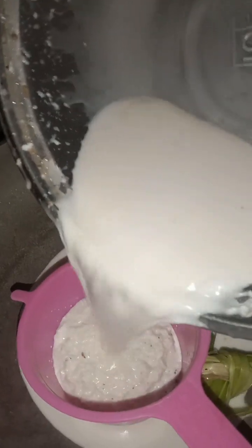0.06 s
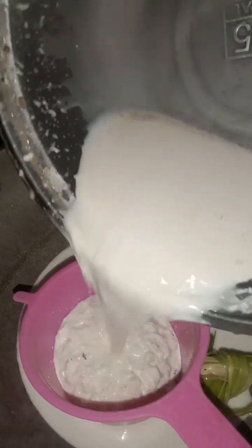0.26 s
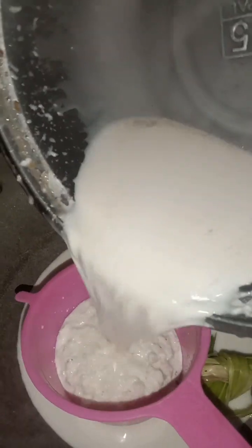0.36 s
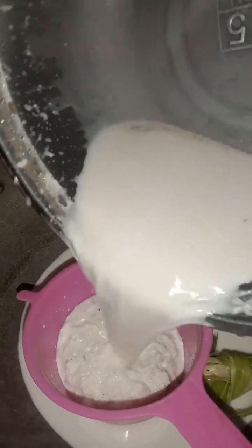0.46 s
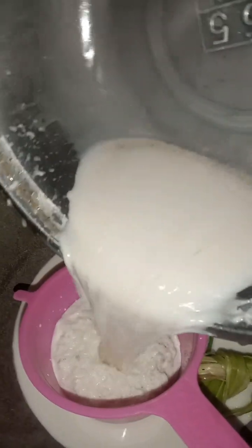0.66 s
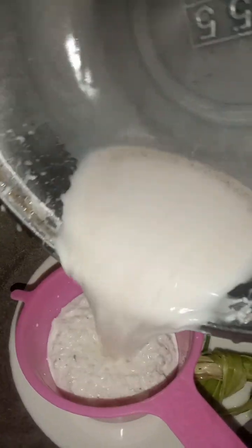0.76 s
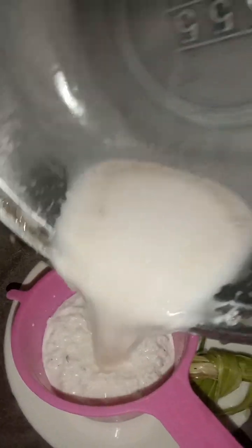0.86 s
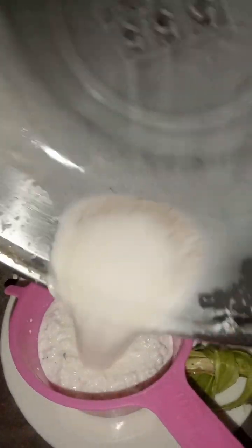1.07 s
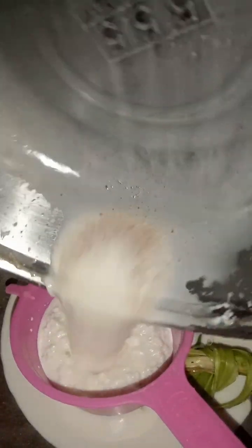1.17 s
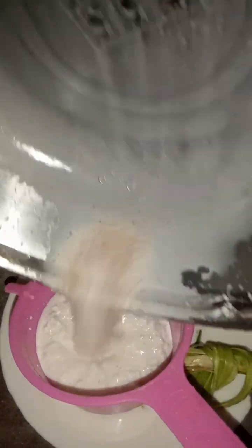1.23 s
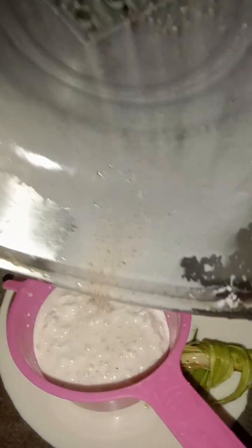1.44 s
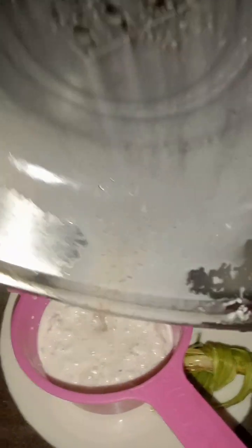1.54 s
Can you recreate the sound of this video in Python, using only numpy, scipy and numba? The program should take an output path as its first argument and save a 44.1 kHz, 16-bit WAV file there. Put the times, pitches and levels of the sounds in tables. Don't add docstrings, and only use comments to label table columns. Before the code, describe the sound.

Thin milky liquid pours from a bowl through a plastic strainer into a pan, hissing and bubbling; a faint low groan of the rim early, then stronger splats, bubble pings and fading trickle, close in a kitchen.

```python
import sys
import numpy as np
from scipy import signal
from scipy.fft import rfft, irfft
from scipy.io import wavfile
from scipy.ndimage import uniform_filter1d
from numba import njit

SR = 44100
rng = np.random.default_rng(int(sys.argv[2]) if len(sys.argv) > 2 else 0)


def gain_from_db(level_db):
    decades = np.asarray(level_db, float) / 20
    return 10 ** decades


def to_wav(s):
    ch = np.atleast_2d(s).T
    pcm = np.round(np.clip(ch, -1, 1) * 32767)
    wavfile.write(sys.argv[1], SR, pcm.astype(np.int16))


N = 70560
T = np.arange(N) / SR

# (time [s], flow [dB], mist [dB], bubbling [dB], gurgle [dB])
FLOW = [(0, -46.5, -20, -19, -7), (.1, -51, -19, -11, -12), (.22, -47.5, -4.5, -15.5, -8.5),
        (.36, -46, -17, -16.5, -12), (.5, -46.5, -4.5, -16, -7.5), (.6, -48.5, -17.5, -15, -13.5),
        (.655, -51, -30, -18, -9), (.69, -42.5, -9.5, -35, -17.5), (.78, -40.5, -6, -10, -5.5),
        (.85, -45.5, -10, -13, -11), (.93, -41.5, -7, -24, -12.5), (1.0, -38.5, -10, -0.5, -10),
        (1.12, -41, -5, -7.5, -11), (1.2, -44.5, -14, -6.5, -9.5), (1.3, -45, -10, -4.5, -14),
        (1.38, -48.5, -20, -24, -13), (1.48, -53, -8, -15.5, -8), (1.6, -58.5, -39, -9, -8)]
# (time [s], peak [dB], pitch [Hz], mist re peak [dB])
SPLAT_EVENTS = [(0.0754, -40, 5700, -13), (0.108, -50, 4830, 6.5), (0.1724, -59, 5400, 2),
                (0.205, -44.5, 6400, 6.5), (0.2306, -26.5, 5300, -33), (0.2738, -28, 6300, -11),
                (0.3396, -28.5, 4550, -26), (0.3904, -50, 5190, -12), (0.4748, -26, 5230, -12),
                (0.5202, -33, 6500, -8), (0.5445, -23.5, 4700, -46), (0.6663, -19, 5250, -19),
                (0.6834, -21, 4940, -23), (0.7397, -32, 5550, -18), (0.7537, -26, 6570, -17),
                (0.7709, -18.5, 5380, -37), (0.7794, -17.5, 5620, -23), (0.795, -14.5, 4970, -6.5),
                (0.8808, -21.5, 5250, -11), (0.9182, -23.5, 5400, -35), (0.9402, -28, 5360, -37),
                (0.7745, -21, 5210, -30), (0.804, -30, 5800, -25), (0.82, -25.5, 4980, -42),
                (0.8654, -32.5, 4890, -30), (0.9986, -20.5, 5300, -22.5), (1.0115, -29, 4900, -25),
                (1.044, -36, 5070, 5), (1.083, -28.5, 7100, -5.5), (1.2759, -32, 5370, -22),
                (0.9645, -26, 5050, -10), (1.0316, -20, 6660, -17), (1.1104, -23.5, 4860, -9),
                (1.2312, -25, 6170, -7.5), (1.3274, -28.5, 4860, -13), (1.4057, -30.5, 5730, -5.5)]


def unit(x):
    return x / np.sqrt(np.mean(x ** 2))


def noise():
    return rng.standard_normal(N)


def curve(table, column):
    table = np.array(table, float)
    return np.interp(T, table[:, 0], table[:, column])


def band(x, lo_hz, hi_hz):
    sos = signal.butter(3, [lo_hz, min(hi_hz, .45 * SR)], "bandpass", fs=SR, output="sos")
    return signal.sosfilt(sos, x)


def colour(x, points):
    hz, db = np.array(points, float).T
    f_hz = np.arange(N // 2 + 1) * SR / N + 1
    gain = gain_from_db(np.interp(np.log(f_hz), np.log(hz), db))
    return unit(irfft(rfft(x) * gain, N))


def flicker(rate_hz, depth_db):
    k = int(SR / rate_hz)
    steps = np.repeat(rng.standard_normal(N // 100), k)[:N]
    return gain_from_db(depth_db * unit(uniform_filter1d(steps, k)))


@njit
def resonate(x, hz, width_hz):
    y, b, l = np.empty(len(x)), 0., 0.
    for i in range(len(x)):
        g, k = np.tan(np.pi * hz[i] / SR), width_hz / hz[i]
        v = (b + g * (x[i] - l)) / (1 + g * (g + k))
        b, l, y[i] = 2 * v - b, l + 2 * g * v, k * v
    return y


@njit
def ring(start, hz, cycles, size, glide, length):
    y = np.zeros(length)
    for j in range(len(start)):
        n, phase = cycles[j] * SR / hz[j], 0.
        for i in range(min(int(5 * n), length - start[j])):
            phase += 2 * np.pi * hz[j] / SR * (1 + glide * i / n)
            y[start[j] + i] += size[j] * (np.exp(-i / n) - np.exp(-6 * i / n)) * np.sin(phase)
    return y


def bubbles(lo_hz, hi_hz, cycles, scatter_db, glide, count):
    u = rng.random((count, 4)).T
    start = (u[0] * N).astype(np.int64)
    hz = lo_hz * (hi_hz / lo_hz) ** u[1]
    size = gain_from_db(-scatter_db * np.log(1 - u[3]))
    return unit(ring(start, hz, cycles * (.5 + u[2]), size, float(glide), N))


def clump(rows):
    delay_s, drop_db, spread = .01, -9, .05
    rows = np.array(rows, float)
    u = rng.random((len(rows), 3, 2))
    out = [rows]
    for k, side in ((1, -1), (2, 1)):
        r = rows.copy()
        r[:, 0] += delay_s * (.3 + u[:, k, 0])
        r[:, 1] += drop_db
        r[:, 2] *= 1 + side * spread * (0.364 + u[:, k, 1])
        out.append(r)
    return np.concatenate(out)


def bursts(db, t60_s):
    attack_s = .001
    dt = np.maximum(T - np.array(SPLAT_EVENTS)[:, :1], 0)
    envelopes = gain_from_db(db[:, None]) * (1 - np.exp(-dt / attack_s)) * 1000. ** (-dt / t60_s)
    return np.sqrt(np.sum(envelopes ** 2, axis=0))


def spray():
    # (frequency [Hz], density [dB per Hz])
    fizz_spectrum = [(4100, -22), (4400, -8.5), (4900, 1), (5500, 5), (6800, -1), (7600, -10), (9000, -16),
                     (10400, -10)]
    flow_db = curve(FLOW, 1)
    s = np.array(SPLAT_EVENTS)
    peak_db, mist_db = s[:, 1], s[:, 1] + s[:, 3]

    fizz = bubbles(3690, 11480, 8.5, 1.23, 0.09, count=9000) + 0.42 * noise()
    fizz = colour(fizz, [(3000, -5)] + list(fizz_spectrum) + [(10900, -55)])
    fizz_level = gain_from_db(flow_db) * flicker(60.21, 1.9) + gain_from_db(-16) * bursts(peak_db, t60_s=.045)

    mist = bubbles(10770, 14070, 2.3, 3.2, 0, count=4000)
    mist = colour(mist, [(10200, -26), (10800, -5.5), (13000, -1), (15300, 11.5)])
    mist_level = gain_from_db(flow_db + curve(FLOW, 2)) * flicker(89.55, 2.1)
    mist_level = mist_level + gain_from_db(-4.0) * bursts(mist_db, t60_s=0.032)

    crack = unit(band(noise(), 3600, 10000)) * gain_from_db(-8.5) * bursts(mist_db, t60_s=0.054)

    c = clump(SPLAT_EVENTS)
    start = (c[:, 0] * SR).astype(np.int64)
    pips = ring(start, c[:, 2], np.full(len(c), 12.), gain_from_db(c[:, 1] + 0.5), 0.019, N)
    return fizz * fizz_level + mist * mist_level + crack + pips


def trickle():
    # (frequency [Hz], density [dB per Hz])
    froth_spectrum = [(1900, -44), (2250, -6.5), (2550, -8), (2850, -3.5), (3150, -0.5), (3500, -0.5),
                      (3900, -0.5), (4300, -19)]
    pan_start_hz, pan_end_hz, pan_width_hz = 1265, 1445, 23
    flow_db = curve(FLOW, 1)
    froth = colour(bubbles(1980, 4146, 7.9, 2.2, 0.025, count=1600), froth_spectrum)
    low = bubbles(1150, 1900, 8., 1.5, .05, count=1500)
    pan_hz = (pan_start_hz + (pan_end_hz - pan_start_hz) * T / T[-1]) * flicker(26.6, 0.05)
    gurgle = .5 * unit(resonate(low + noise(), pan_hz, float(pan_width_hz))) + low
    return froth * gain_from_db(flow_db + curve(FLOW, 3)) + gurgle * gain_from_db(flow_db + curve(FLOW, 4))


def pings():
    # (time [s], peak [dB], pitch [Hz],
    # ring [s])
    low_events = [(.195, -47, 1700, .13), (.175, -49, 1255, .12), (.245, -45, 1245, .07),
                  (.325, -43, 1250, .12), (.39, -42, 1240, .04), (.28, -52, 1280, .1), (.43, -49, 1290, .2),
                  (.53, -51, 1300, .25), (.66, -49, 1280, .05), (.36, -50, 850, .11), (.03, -56, 700, .25),
                  (.1, -50, 135, .14), (.1, -50, 500, .2), (.37, -54, 130, .1), (.32, -47, 700, .05),
                  (.466, -44, 862, .06), (.468, -45, 718, .09), (.468, -50, 500, .2), (.7, -50, 1010, .06),
                  (.712, -41, 1270, .08), (.757, -38, 1290, .055), (.76, -44, 1650, .06),
                  (.79, -35, 1290, .035), (.815, -33, 1190, .045), (.818, -41, 1480, .05),
                  (.85, -47, 1100, .06), (.872, -44, 1170, .08), (.888, -41, 1010, .05),
                  (.81, -52, 500, .09), (.88, -50, 500, .14), (.964, -44, 842, .07), (.965, -48, 311, .13),
                  (.96, -50, 1200, .05), (1.03, -44, 1650, .06), (1.095, -44, 1650, .06),
                  (1.04, -46, 1370, .08), (1.09, -43, 1370, .12), (1.09, -50, 800, .06),
                  (1.172, -43, 1358, .07), (1.236, -41, 1360, .1), (1.29, -56, 698, .3),
                  (1.425, -58, 300, .12), (1.25, -60, 310, .2)]
    # (time [s], peak [dB], pitch [Hz], ring [s])
    high_events = [(.468, -49, 3780, .05), (.545, -52, 4080, .09), (.68, -52, 3180, .06),
                   (.7935, -35, 3000, .012), (.7935, -40, 2350, .015), (.939, -40, 3860, .03),
                   (.971, -28, 2790, .018), (.991, -21, 2860, .026), (1.009, -31, 2780, .02),
                   (1.025, -37, 2850, .04), (1.043, -34, 2950, .015), (.99, -39, 3450, .04),
                   (1.015, -36, 3300, .025), (1.044, -38, 3650, .03), (1.005, -42, 2250, .04),
                   (1.173, -42, 2280, .025), (1.174, -42, 2900, .02), (1.233, -32, 2900, .022),
                   (1.275, -41, 3470, .035), (1.075, -46, 3550, .1), (1.325, -51, 2400, .03),
                   (.875, -55, 2750, .06)]
    hold, fade, glide = .35, .4, .015
    events = clump(list(low_events) + list(high_events))
    start_s, peak_db, hz, ring_s = events.T[:, :, None]
    dt = np.maximum(T - start_s, 0)
    swell = np.sin(np.pi / 2 * np.minimum(dt / (0.0057 + 0.84 / hz), 1)) ** 2
    decay = 1000. ** (-np.maximum(dt - hold * ring_s, 0) / (fade * ring_s))
    tone = np.sin(2 * np.pi * hz * dt * (1 + glide * np.minimum(dt / ring_s, 1) / 2))
    return np.sum(gain_from_db(peak_db) * swell * decay * tone, axis=0) * flicker(150, 2.2)


def body(x, modes):
    lean_s = .25
    lean = np.clip(T / lean_s, 0, 1) ** 2
    out = 0
    for hz, width_hz, db, lean_db, rise in modes:
        hz = hz * flicker(12, .12) * (1 + rise * lean)
        level = gain_from_db(db + lean_db * lean) * flicker(11.7, 0.29)
        once = resonate(x, hz, float(width_hz))
        out = out + level * unit(resonate(once, hz, float(width_hz)))
    return unit(out)


def groan():
    # (time [s], hum [dB], rasp [dB])
    friction = [
        (.03, -80, -75),
        (.065, -42, -58.5),
        (.13, -61, -47),
        (.17, -50, -47.5),
        (.28, -44.5, -42.5),
        (.33, -55, -46.5),
        (.38, -46, -66.5),
        (.48, -58, -52.5),
        (.53, -83, -85),
    ]
    # (frequency [Hz], width [Hz], level [dB], gain on leaning [dB], pitch rise on leaning [0-1])
    bowl_modes = [(133, 40, -2, 1.5, 0), (296, 57, -12.5, 5.5, 0.01), (500.7, 120, 0, -6, 0.02),
                  (690.3, 85, -10, 8.5, 0.08)]
    slip_hz = 67.03
    turn = np.cumsum(slip_hz * flicker(30.03, 0.35)) / SR
    slips = np.diff(np.floor(turn), prepend=0) * flicker(70, 1.7)
    hum = np.sin(2 * np.pi * turn) * flicker(44, 1)
    rasp = body(slips + 0.067 * noise(), bowl_modes)
    return hum * gain_from_db(curve(friction, 1)) + rasp * gain_from_db(curve(friction, 2))


def rumble():
    # (time [s], level [dB])
    shift = [
        (.72, -72),
        (.78, -49.5),
        (.83, -53.5),
        (.93, -62.5),
        (.99, -82),
        (1.06, -71),
        (1.12, -62),
        (1.18, -74),
        (1.52, -83),
        (1.58, -65),
    ]
    # (frequency [Hz], width [Hz], level [dB], gain on leaning [dB], pitch rise on leaning [0-1])
    pan_modes = [(83.4, 25, 0.5, 0.5, 0.09), (125.4, 43, -1, 3, 0.02)]
    return body(noise(), pan_modes) * gain_from_db(curve(shift, 1))


def kitchen():
    # (frequency [Hz], density [dB per Hz])
    room_spectrum = [(40, -29), (95, -46), (150, -1.5), (220, -21.5), (1500, -7.5), (2200, -31.5),
                     (6000, -34), (10300, -16)]
    floor = colour(noise(), list(room_spectrum) + [(11000, -35)])
    return floor * gain_from_db(-61.5 + 2.5) * flicker(7.74, 0.69)


def echo(near):
    t60_s, level_db = .25, -8
    n = np.arange(SR // 2)
    tail = rng.standard_normal(len(n)) * 1000. ** (-n / SR / t60_s)
    wet = signal.fftconvolve(near, tail / np.sqrt(np.sum(tail ** 2)))[:N]
    return gain_from_db(level_db) * band(wet, 44, 11000)


def scene():
    near = spray() + trickle() + pings() + groan() + rumble()
    return (near + echo(near) + kitchen())[None]


def low_pass(x):
    return signal.sosfilt(signal.butter(12, 16380, fs=SR, output="sos"), x)


def record(dry):
    low_cut = signal.butter(3, 52, "highpass", fs=SR, output="sos")
    top_cut = signal.ellip(8, .2, 60, 15300, fs=SR, output="sos")
    mix = signal.sosfilt(top_cut, signal.sosfilt(low_cut, dry))
    return low_pass(mix)


dry = scene()
out = record(dry)
to_wav(out)
```